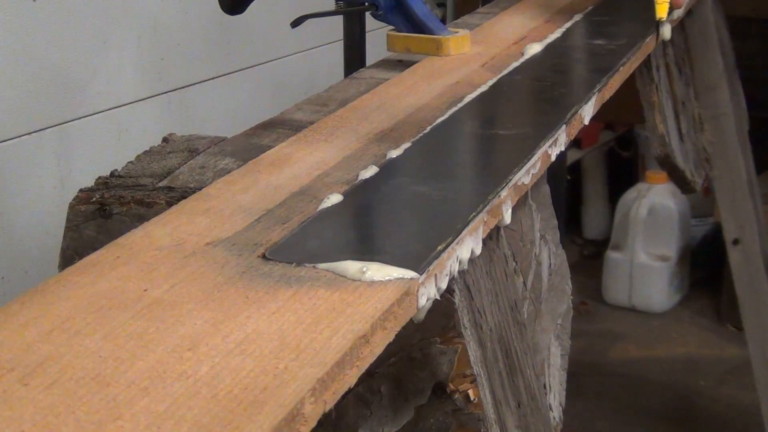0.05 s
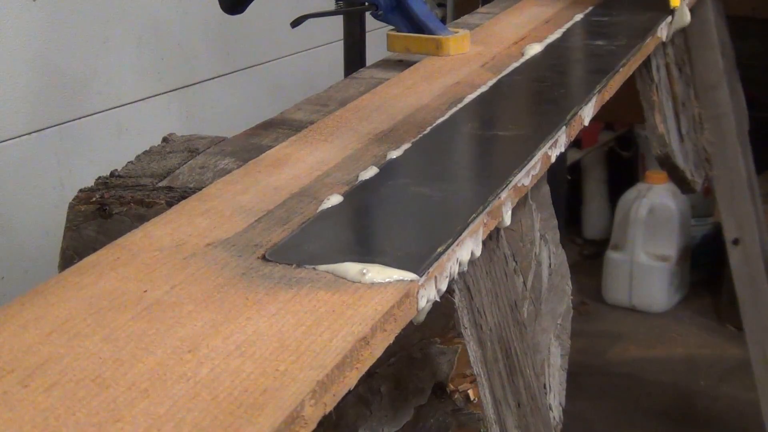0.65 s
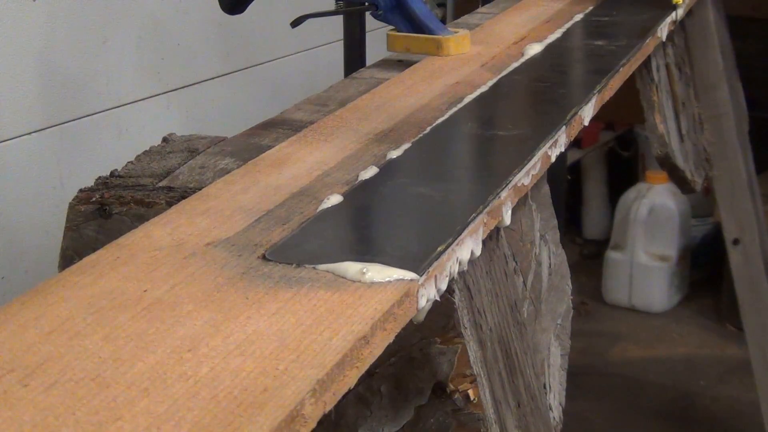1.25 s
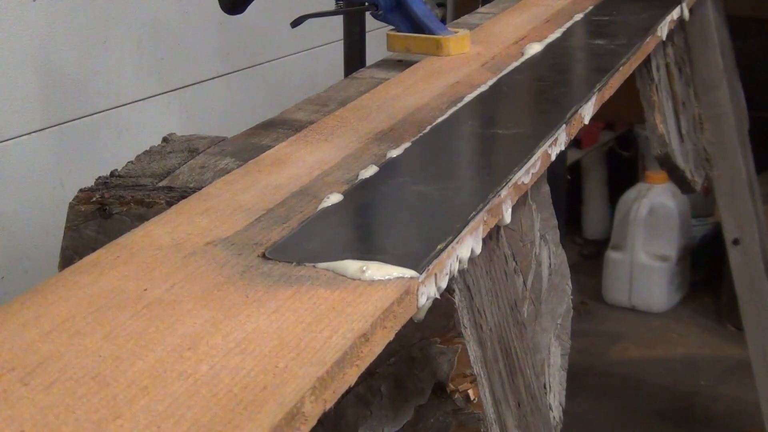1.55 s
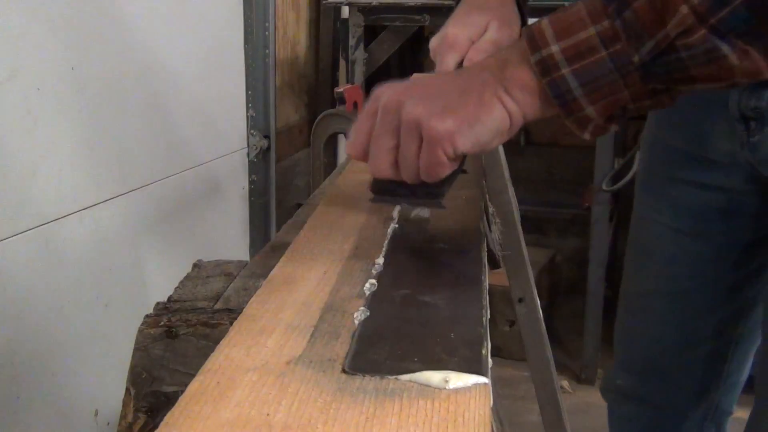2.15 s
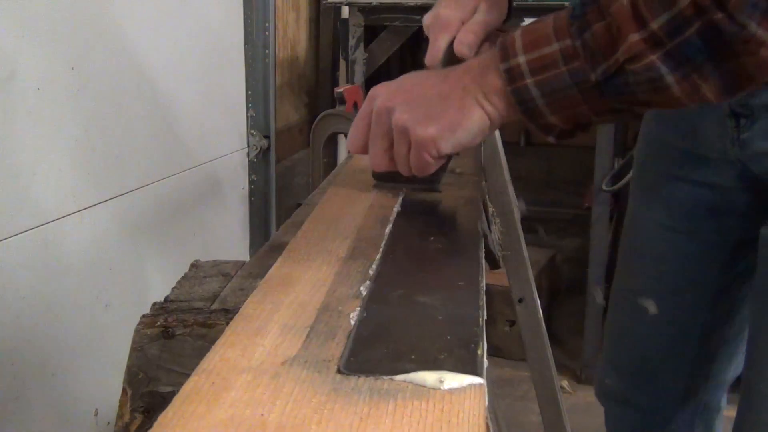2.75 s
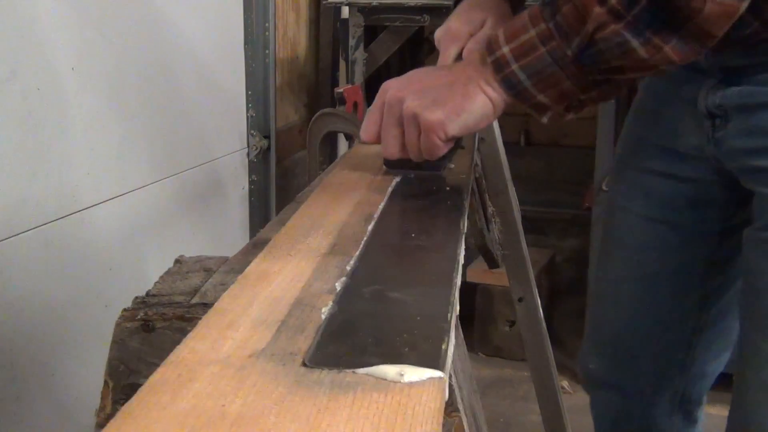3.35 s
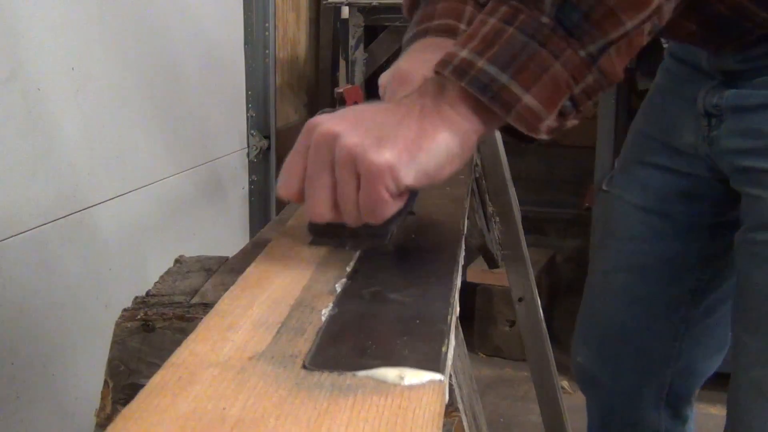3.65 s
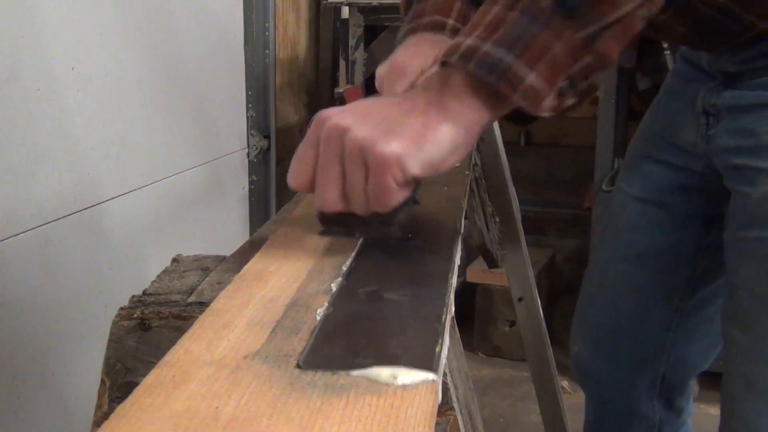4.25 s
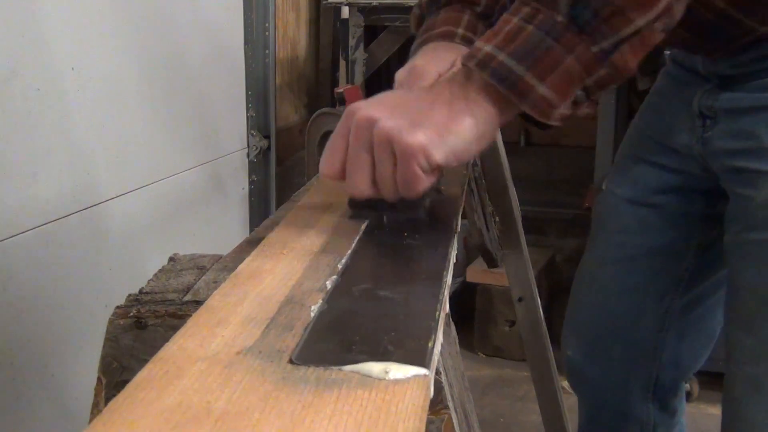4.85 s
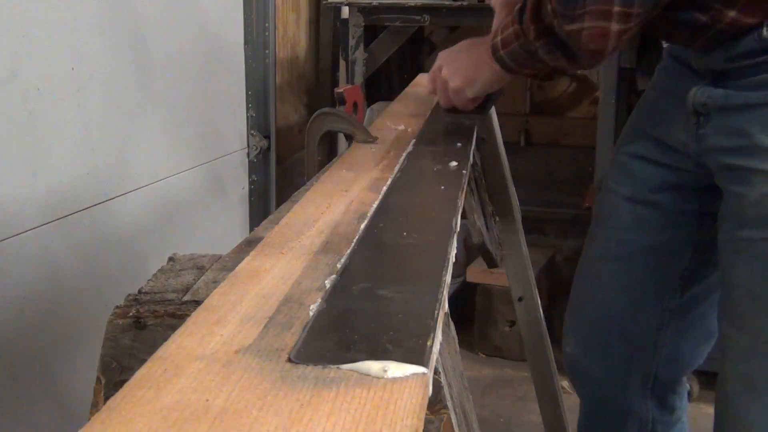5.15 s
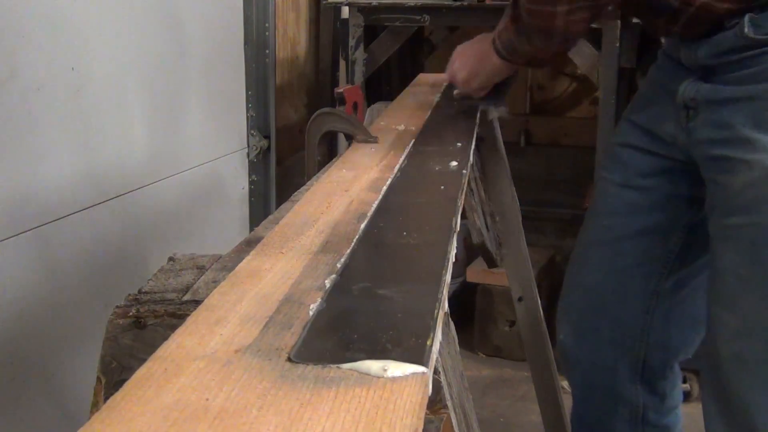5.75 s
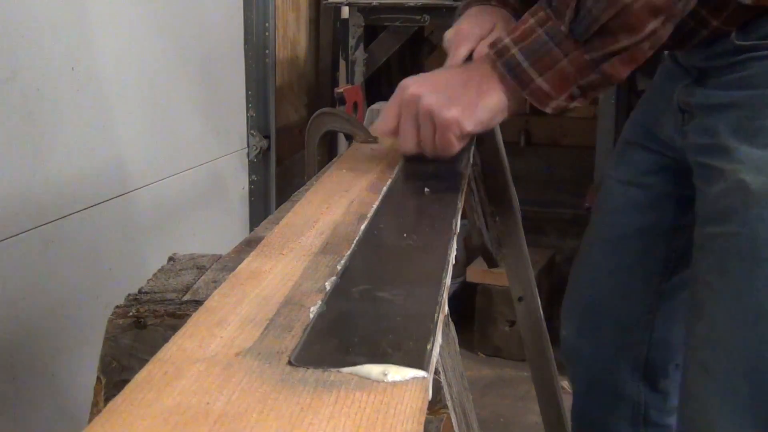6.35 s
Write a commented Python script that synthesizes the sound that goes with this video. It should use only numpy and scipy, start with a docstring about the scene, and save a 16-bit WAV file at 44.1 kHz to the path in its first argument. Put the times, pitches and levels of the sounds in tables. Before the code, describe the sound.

A hand blade crunches through hardened glue, then scrapes along a steel strip on a wooden board in eight clacking, hissing strokes.

```python
"""Short, squeaky crunches come first: a hand blade pares hardened glue from the far edge of a steel strip
on a wooden board. Eight long strokes follow, each a clack and a hiss on the steel, with a judder where
the blade meets glue. Stick-slip friction and impacts drive the resonances of blade and board; nearly
periodic slipping squeals, and beads of glue snap by brittle fracture. The small workshop reverberates,
and a limiter holds the peaks."""
import sys
import numpy as np
from scipy import signal
from scipy.fft import rfft, irfft, next_fast_len
from scipy.io import wavfile
from scipy.ndimage import uniform_filter1d

SR = 44100
rng = np.random.default_rng(int(sys.argv[2]) if len(sys.argv) > 2 else 0)


def transcribe(signal):
    """Save signal, clipped to [-1, 1], as a 16-bit WAV file at the path in sys.argv[1]."""
    frames = np.atleast_2d(signal).T
    limited = np.clip(frames, -1, 1)
    pcm = np.round(limited * 32767).astype(np.int16)
    wavfile.write(sys.argv[1], SR, pcm)


N = 287091
TIME = np.arange(N) / SR


def gain_of(db):
    return 10 ** (np.asarray(db) / 20)


def unit_rms(x):
    return x / np.sqrt(np.mean(x ** 2) + 1e-20)


def curve_at(points, hz):
    """Interpolation of (frequency, value) points on a logarithmic frequency axis."""
    point_hz, value = np.transpose(points)
    return np.interp(np.log(hz + 1), np.log(point_hz + 1), value)


def add(mix, start_s, sound):
    part = mix[max(round(start_s * SR), 0):][:len(sound)]
    part += sound[:len(part)]


def wander(cutoff_hz, count=N):
    """Random modulation: low-passed Gaussian noise of rms 1."""
    size = next_fast_len(count, real=True)
    rolloff = 1 + (np.fft.rfftfreq(size, 1 / SR) / cutoff_hz) ** 4
    return unit_rms(irfft(rfft(rng.standard_normal(size)) / rolloff, size)[:count])


def radiate(force, spectrum, modes=()):
    """Source and filter: a force drives a broad minimum-phase response with resonances standing on it."""
    hz = np.fft.rfftfreq(2 ** 13, 1 / SR)
    log_gain = np.log(gain_of(curve_at(spectrum, hz)))
    mirrored = np.r_[log_gain, log_gain[-2:0:-1]]
    broad = np.exp(np.conj(signal.hilbert(mirrored)))[:len(hz)]
    peaks = sum(gain_of(db) / (1 + 2j * (hz - mode_hz) / width) for mode_hz, width, db in modes)
    response = irfft(broad * (1 + peaks))
    return signal.oaconvolve(force, response / np.linalg.norm(response))[:N]


def slips(per_s, spread_db, clump_db, clump_hz):
    """Irregular stick-slip friction: tiny releases of uneven size that come in clumps."""
    size = gain_of(spread_db * np.minimum(rng.exponential(1, N), 4) + clump_db * wander(clump_hz))
    return unit_rms(size * rng.choice([-1, 1], N) * (rng.random(N) < per_s / SR))


def pushes(rows, level_column, steepness, release_s):
    """Loading and relaxation: force builds as the edge bites, holds, and decays as the hand eases."""
    force = np.zeros(N)
    for row in rows:
        touch, build, hold = row[:3]
        t = TIME - touch
        bite = np.clip(t / build, 0, 1) ** steepness
        release = np.exp(-np.maximum(t - build - hold, 0) / release_s)
        force += gain_of(row[level_column]) * bite * release
    return force


# Resonances of the board with its strip, and of the blade:
# (frequency [Hz], bandwidth [Hz], level over the broad response [dB])
BOARD_MODES = [(187, 51, 11.5), (242.5, 7.6, 15.5), (351, 12.4, 2.5), (391, 120, -0.5), (460, 21, 1),
               (526, 34, 1), (777, 28, -3), (943, 51, -7.5), (1041.3, 15, 2.5), (1266, 60, -2.5),
               (1450, 98, -0.5), (1848, 140, -6.5)]
BLADE_MODES = [(1700, 310, -5), (2460, 540, -6), (3320, 180, -11.5), (4530, 47, -15), (5540, 310, -3),
               (8850, 41, -16.5), (9700, 62, -17), (12150, 46, 3)]
# Spectra of crunching glue, its crumbs and the struck blade: (frequency [Hz], relative level [dB])
CRUNCH_SPECTRUM = [(30, -45), (60, -18), (155, -18.5), (284, -13.5), (480, 1), (700, -0.5), (1120, -1),
                   (1500, 0.5), (2000, 0.5), (2700, -16.5), (4200, -17.5), (9000, -35.5)]
CRUMB_SPECTRUM = [(1500, -19), (3000, 0), (5000, -2), (8000, -5.5), (13000, -3), (16000, -14)]
CLACK_SPECTRUM = [(200, -9.5), (900, -6.5), (1700, 9.5), (2400, 5.5), (3200, 0), (4300, 0.5), (6000, -11),
                  (8400, -6), (12000, -15), (16000, -9.5)]
# Short pushes: (time [s], build-up [s], hold [s], relative crunch level [dB], relative crumb level [dB])
PARING_PUSHES = [(-0.02, 0.011, 0.0044, -20.5, -19), (0.071, 0.081, 0.033, -16.5, -30.5),
                 (0.303, 0.079, 0.058, -29, -35.5), (0.554, 0.079, .03, -14, -28),
                 (0.848, 0.078, 0.051, -25, -36.5), (1.073, 0.05, 0.049, -34.5, -39.5),
                 (1.356, 0.07, 0.034, -20, -32), (1.539, 0.044, 0.064, -21.5, -38.5),
                 (1.741, .016, 0.069, -20.5, -35), (1.935, 0.048, .2, -34, -43)]


def paring():
    """Forced vibration: pushes crunch through the glue and shake board and blade; crumbs crackle off."""
    force = pushes(PARING_PUSHES, level_column=3, steepness=1.49, release_s=0.013)
    crunch = slips(per_s=2200, spread_db=4.5, clump_db=2, clump_hz=69) * force
    crumbling = pushes(PARING_PUSHES, level_column=4, steepness=0.72, release_s=0.027)
    crumbs = slips(per_s=5900, spread_db=2.5, clump_db=0.6, clump_hz=70) * crumbling
    # The blade's ring grows as the square of the force, so hard pushes sound brighter.
    return (gain_of(-1) * radiate(crunch, CRUNCH_SPECTRUM, BOARD_MODES)
            + gain_of(10.5) * radiate(crunch * force, CLACK_SPECTRUM, BLADE_MODES)
            + gain_of(-2) * radiate(crumbs, CRUMB_SPECTRUM))


def swells(rows):
    """Superposition of Gaussian envelopes, each down to 1/e at a half-width from its centre."""
    return sum(gain_of(db) * np.exp(-((TIME - centre) / half_width) ** 2)
               for centre, db, half_width in rows)


# Spectrum of the blade sliding on steel: (frequency [Hz], relative level [dB])
HISS_SPECTRUM = [(1500, -21), (3500, -2.5), (5500, -3), (7000, 3), (8200, 4), (9200, 2.5), (10200, 6.5),
                 (11400, 6.5), (12200, 4), (13200, 3.5), (14500, 1), (15800, -4), (17000, -25)]
# Light touches on the strip: (time [s], relative level [dB], half-width [s])
BRUSH_TOUCHES = [(0.0, -37, 0.014), (2.947, -51, 0.25), (3.05, -48, 0.0078), (6.104, -34.5, 0.023),
                 (6.318, -43, 0.018)]


def brushes():
    """Friction noise: the lifted blade grazes the strip on its way back."""
    return radiate(swells(BRUSH_TOUCHES) * rng.standard_normal(N), HISS_SPECTRUM, BLADE_MODES)


def friction_tones(rows, jitter_rate_hz):
    """Nearly periodic stick-slip: the edge catches and lets go in unsteady, gliding tones."""
    tones, t = np.zeros(N), TIME[:SR // 2]
    for start, length, first_hz, last_hz, db, jitter_hz in rows:
        progress = np.minimum(t / length, 1)
        pitch = first_hz * (last_hz / first_hz) ** progress
        jitter = jitter_hz * np.sqrt(pitch / 1000) * wander(jitter_rate_hz, count=len(t))
        wave = np.sin(2 * np.pi * np.cumsum(pitch + jitter) / SR)
        flutter = gain_of(3 * wander(cutoff_hz=120, count=len(t)))
        arch = np.sin(np.pi * progress ** 0.62) ** 2  # one swell with an early crest
        add(tones, start, gain_of(db) * arch * unit_rms(wave * flutter))
    return tones


# Chatter of blade or board, and squeals of the sticking edge: (time [s], duration [s],
# first frequency [Hz], last frequency [Hz], relative level [dB], rms jitter referred to 1 kHz [Hz])
CHATTER_GLIDES = [(.11, 0.11, 1585, 1474, -16, 169), (.635, 0.071, 1576, 1450, -14, 184),
                  (2.23, 0.37, 1002, 1102, -38.5, 109), (2.24, 0.23, 2040, 2226, -34.5, 102),
                  (2.78, 0.55, 249, 284.6, -35.5, 60), (2.86, 0.52, 482, 559, -39, 69.3),
                  (3.378, 0.081, 383, 360, -9, 76), (3.88, 0.13, 4400, 4300, -18, 186),
                  (4.519, 0.13, 435.5, 427, -14, 65.6), (5.15, 0.094, 1676, 1564, -13.5, 86),
                  (5.765, 0.1, 1819, 1410, -14.5, 86), (6.4, .16, 1504, 1430, 1.5, 69)]
SQUEAL_GLIDES = [(0.185, 0.058, 14150, 12630, -9, 151), (0.924, .065, 14840, 8240, -15, 91),
                 (1.386, 0.036, 15900, 15200, -32, 70), (1.427, 0.023, 15100, 12800, -18, 81),
                 (3.152, 0.062, 11300, 11540, 2.5, 40.2), (3.415, 0.039, 8300, 8100, -27, 80),
                 (4.894, .026, 8460, 8450, -14, 40), (6.386, 0.4, 8870, 8400, 0.5, 45)]


def chatter_and_squeals():
    """Self-excited vibration: the whole blade and the board chatter; the stiff edge squeals high up."""
    squeals = friction_tones(SQUEAL_GLIDES, jitter_rate_hz=480)
    chatter = friction_tones(CHATTER_GLIDES, jitter_rate_hz=130)
    return gain_of(-1) * chatter + gain_of(-0.5) * squeals


def blows(rows, level_column, decay_s):
    """Impulsive excitation: each blow is a burst of tiny contacts that decays exponentially."""
    force, t = np.zeros(N), TIME[:SR // 8]
    for row in rows:
        burst = rng.choice([-1, 1], len(t)) * np.exp(-t / decay_s)
        add(force, row[0], gain_of(row[level_column]) * burst)
    return force


# Spectrum of cracking glue: (frequency [Hz], relative level [dB])
SNAP_SPECTRUM = [(1000, -47), (3500, 7.5), (7500, 11), (11000, 12.5), (16000, -4)]
# Beads of glue breaking: (time [s], relative crack level [dB], relative knock level [dB])
BEAD_SNAPS = [(0.6205, 1, 2), (0.736, -8.5, -42), (1.168, -1, -45), (1.354, -23, -37), (1.502, -16, -9),
              (1.561, -34, -6), (1.998, 1, -24), (3.0945, -25, -21.5), (4.0326, -15, -26)]


def snaps():
    """Brittle fracture: beads of glue crack off and the freed blade knocks the board."""
    crack = radiate(blows(BEAD_SNAPS, level_column=1, decay_s=0.00052), SNAP_SPECTRUM)
    knock = radiate(blows(BEAD_SNAPS, level_column=2, decay_s=0.0049), CRUNCH_SPECTRUM, BOARD_MODES)
    return gain_of(-1) * crack + gain_of(-2) * knock


# Spectrum of the shaken board: (frequency [Hz], relative level [dB])
BOARD_SPECTRUM = [(25, -55.5), (60, -20.5), (120, -9), (180, -11), (250, -6.5), (340, -2), (520, -1.5),
                  (750, 2.5), (1300, -9), (3000, -55)]
# Long strokes, with relative levels: (landing time [s], wait before the pull [s], pull duration [s],
# clack level [dB], thud level [dB], hiss level [dB], rasp level [dB])
LONG_STROKES = [(1.9964, 0, 0.094, -14, -37.5, -8, -10), (2.4614, 0.02, 0.23, -10, -21.5, -10, -11.5),
                (3.1081, 0.00024, 0.21, -0.5, -49, -6, -10), (3.68, 0.038, 0.18, 7.5, -23, -6.5, -8.5),
                (4.337, .001, 0.18, 2, -29.5, -7, -10.5), (4.893, 0.0074, 0.28, -7, -35, -13, -16.5),
                (5.5479, .02, 0.28, -8, -37, -14, -18), (6.3686, 0, 0.32, 4.5, -19.5, 2.5, -2)]


def landings():
    """Impact excites free vibration: the blade clacks down on the strip and the board thuds under it."""
    clack = radiate(blows(LONG_STROKES, level_column=3, decay_s=0.0083), CLACK_SPECTRUM, BLADE_MODES)
    thud = radiate(blows(LONG_STROKES, level_column=4, decay_s=0.023), BOARD_SPECTRUM, BOARD_MODES)
    return gain_of(-1) * clack + gain_of(7.5) * thud


def pulls(level_column, skim_db, fall_db_per_s, rise_s=0.015):
    """Friction level follows sliding speed: a pull gains skim_db midway and dies as the hand slows."""
    envelope = np.zeros(N)
    for row in LONG_STROKES:
        landing, wait, length = row[:3]
        t = np.maximum(TIME - landing - wait, 0)
        speed = np.sin(np.pi * np.minimum(t / length, 1))
        level_db = row[level_column] + skim_db * speed - fall_db_per_s * np.maximum(t - length, 0)
        envelope += np.minimum(t / rise_s, 1) * gain_of(level_db)
    return envelope


def moving_contact(force, depth_db):
    """Time-varying filtering: as the contact wanders along the edge, spectral patches come and go."""
    spectra = signal.stft(force, nperseg=512, noverlap=384)[2]
    patch = np.outer(np.hanning(8), np.hanning(32))  # about 300 Hz by 40 ms
    patches = unit_rms(signal.fftconvolve(rng.standard_normal(spectra.shape), patch, "same"))
    shaded = spectra * gain_of(depth_db * patches)
    return unit_rms(signal.istft(shaded, nperseg=512, noverlap=384)[1][:N])


# Spectrum of the blade dragging in glue: (frequency [Hz], relative level [dB])
RASP_SPECTRUM = [(200, -29), (600, -9.5), (1100, -1.5), (1650, -1), (2400, -2), (2900, -2), (3500, -0.5),
                 (5000, -6), (9000, -21.5)]
# Ridges of glue that the slowing blade meets: (time [s], relative level [dB], half-width [s])
GLUE_RIDGES = [(2.13, -26.5, 0.12), (2.76, -34.5, 0.18), (3.405, -13, 0.031), (3.93, -20, 0.06),
               (4.58, -26.5, 0.081), (5.13, -41, 0.041)]


def scraping():
    """Sliding friction: fine slips hiss on steel, coarser ones rasp in glue, the coarsest judder wood."""
    hiss = moving_contact(slips(per_s=16000, spread_db=2, clump_db=2, clump_hz=200), depth_db=2.5)
    rasp = moving_contact(slips(per_s=5000, spread_db=2, clump_db=1.5, clump_hz=120), depth_db=4)
    judder = slips(per_s=900, spread_db=0.4, clump_db=3.3, clump_hz=60)
    slide = pulls(level_column=5, skim_db=5, fall_db_per_s=330)
    drag = pulls(level_column=6, skim_db=0.5, fall_db_per_s=161)
    shake = gain_of(-29.5) * drag + swells(GLUE_RIDGES)  # the board always trembles under the rasp
    return (gain_of(-3.7) * radiate(hiss * slide, HISS_SPECTRUM, BLADE_MODES)
            + gain_of(-2.5) * radiate(rasp * drag, RASP_SPECTRUM, BLADE_MODES)
            + gain_of(1.5) * radiate(judder * shake, BOARD_SPECTRUM, BOARD_MODES))


# Decay of the workshop: (frequency [Hz], reverberation time [s])
ROOM_T60 = [(150, 0.63), (400, 0.44), (1000, 0.41), (2800, 0.41), (7300, 0.45), (15000, 0.21)]
# Stereo difference of the reflections: (frequency [Hz], side level relative to mid [dB])
SIDE_LEVELS = [(100, -17), (400, -7.5), (1200, -12), (4000, -13.5), (11000, -11), (15000, -15)]


def room(dry, wet_db):
    """Reverberation: close walls answer within milliseconds, almost alike on the left and right."""
    onset = np.clip(TIME[:SR] / 0.006, 0, 1) ** 2
    echoes = rng.standard_normal((2, SR)) * (rng.random((2, SR)) < 5000 / SR) * onset
    hz, t, spectra = signal.stft(echoes, SR, nperseg=256)
    spectra[1] *= gain_of(curve_at(SIDE_LEVELS, hz))[:, None]
    decay = gain_of(-60 * t / curve_at(ROOM_T60, hz)[:, None])
    tails = signal.istft(spectra * decay, SR, nperseg=256)[1]
    tails /= np.linalg.norm(tails[0])
    mid, side = gain_of(wet_db) * signal.fftconvolve(dry[None], tails, axes=1)[:, :N]
    return dry + mid + np.array([side, -side])


# Spectrum of the quiet workshop: (frequency [Hz], relative level [dB])
AMBIENT_SPECTRUM = [(25, -21.5), (100, -5.5), (400, -7.5), (1000, -14), (3000, -18), (8000, -27.5),
                    (16000, -22.5)]


def ambience():
    """Stationary noise: a faint, low hush lies under the work."""
    return gain_of(-52) * radiate(rng.standard_normal(N), AMBIENT_SPECTRUM)


def scene():
    """The direct-to-reverberant ratio conveys distance: the paring lies further off than the strokes."""
    far = room(paring(), wet_db=-4.5)
    near = room(scraping() + landings() + snaps() + chatter_and_squeals() + brushes(), wet_db=-8)
    # Both lean slightly to the left.
    return far * gain_of([[0.4], [-0.4]]) + near * gain_of([[0.15], [-0.15]]) + ambience()


def limiter(x, ceiling_db, recovery_db_per_s):
    """Automatic gain control: gain drops at once above the ceiling, then recovers; bass counts less."""
    sensed = signal.sosfilt(signal.butter(1, 550, "highpass", fs=SR, output="sos"), x)
    power = uniform_filter1d((sensed ** 2).mean(0), size=100)
    power_db = 10 * np.log10(abs(power) + 1e-12)
    recovery_db = TIME * recovery_db_per_s
    peak_db = np.maximum.accumulate(power_db + recovery_db) - recovery_db
    excess_db = np.maximum(peak_db - ceiling_db, 0)
    return x / gain_of(uniform_filter1d(excess_db, size=30))


def record(dry):
    """Peak and band limiting: the limiter, soft saturation of the last peaks, then a 16 kHz low-pass."""
    held = limiter(gain_of(-0.5) * dry, ceiling_db=-10, recovery_db_per_s=136)
    rounded = held / (1 + held ** 4) ** (1 / 4)
    lowpass = signal.firwin(511, 16000, window=("kaiser", 9), fs=SR)
    return signal.oaconvolve(rounded, lowpass[None], "same")


dry = scene()
out = record(dry)
transcribe(out)
```